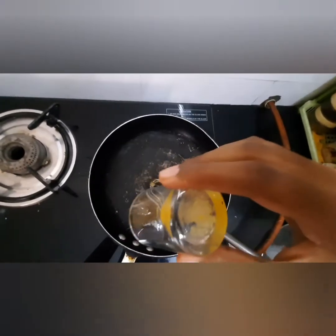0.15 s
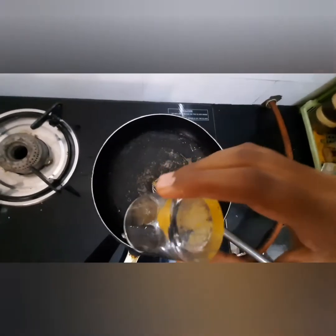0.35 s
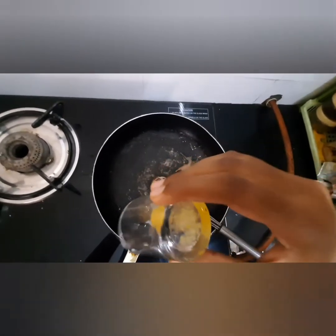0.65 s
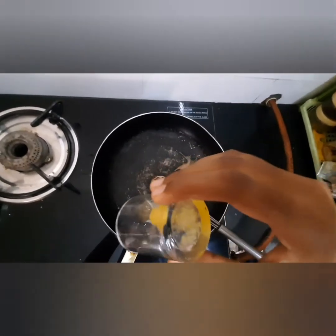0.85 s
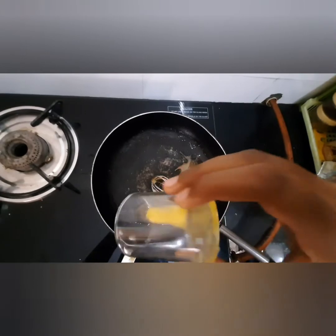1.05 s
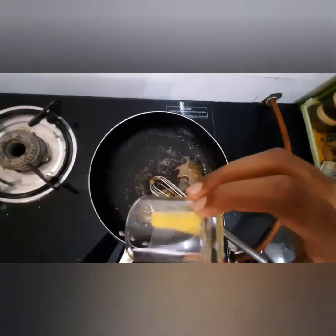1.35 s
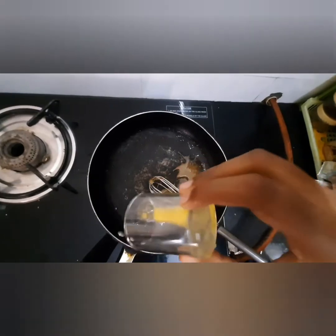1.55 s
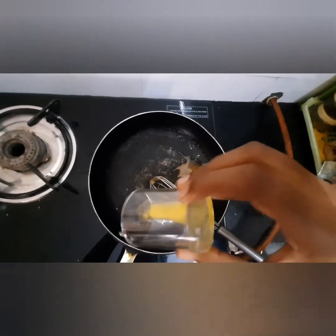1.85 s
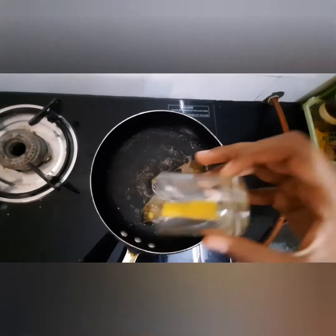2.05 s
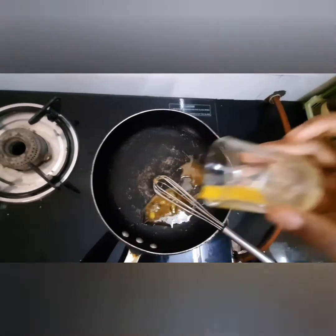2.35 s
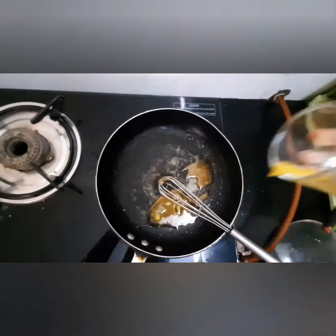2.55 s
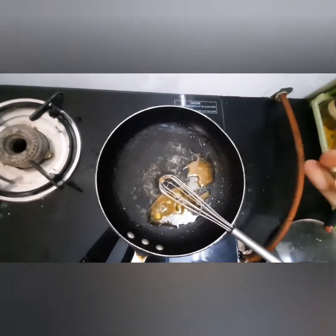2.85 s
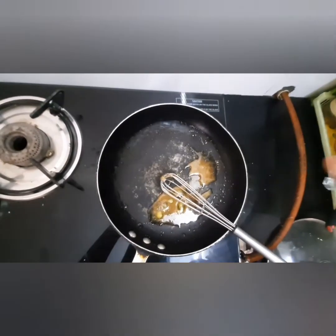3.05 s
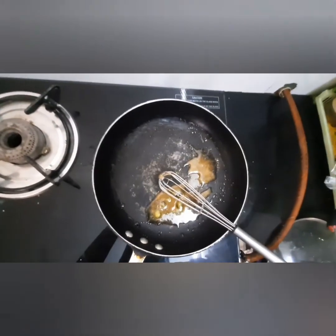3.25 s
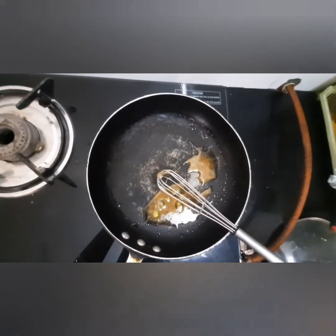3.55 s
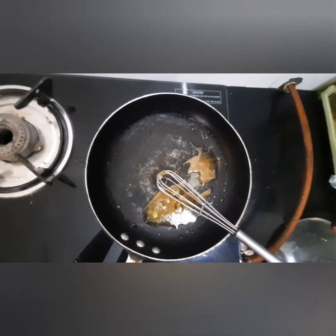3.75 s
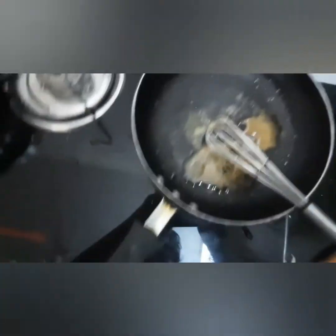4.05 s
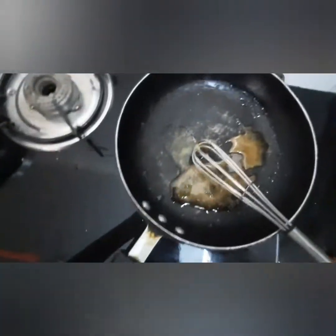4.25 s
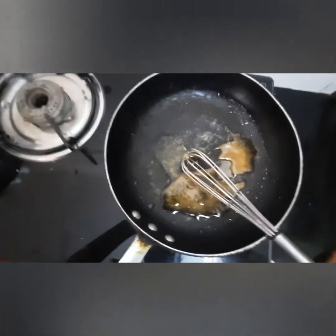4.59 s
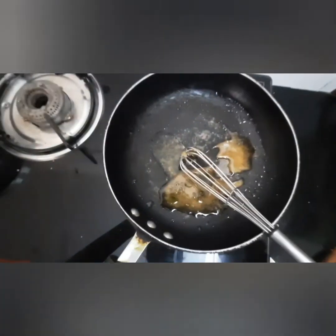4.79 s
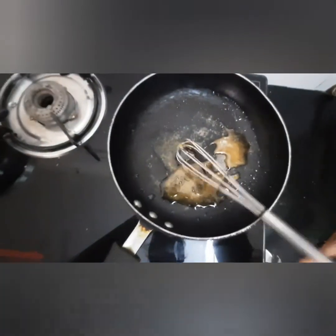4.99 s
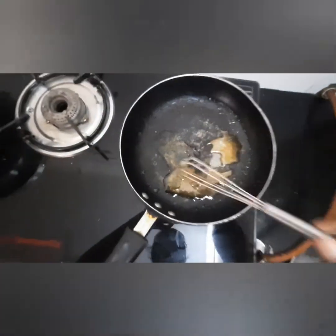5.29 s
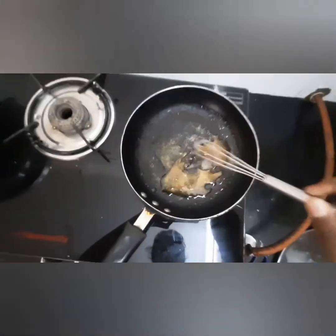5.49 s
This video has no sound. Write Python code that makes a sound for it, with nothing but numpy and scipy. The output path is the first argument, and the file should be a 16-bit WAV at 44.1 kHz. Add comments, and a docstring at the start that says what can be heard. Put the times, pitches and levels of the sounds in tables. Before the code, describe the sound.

Nearly quiet at first: low burner flutter, a faint grainy simmer, tiny sticky clicks from a glass. Then butter fries in a pan, thin and distant, with a quick cluster of hard knocks. The microphone seems to move nearer and the frying turns loud, dense and spitting. Metal wires finally clink and rasp on the pan. Short, dry kitchen reflections, stereo pickup.

```python
"""Frying fat fizzes, spits and crackles as melted butter floods hot sugar in a pan: clumped clicks,
ringing bubbles, noise, and single pops and pings. A wire whisk taps and scrapes the pan's modes at the end.
Before that, a glass ticks, creeps and knocks: short decaying modes and noise snaps.
Below lie a gas burner's drone and flutter, a faint simmer of the sugar and the still of the kitchen."""
import sys
import numpy as np
from scipy import signal
from scipy.fft import rfft, irfft
from scipy.io import wavfile
from scipy.ndimage import uniform_filter1d

SR = 44100
rng = np.random.default_rng(int(sys.argv[2]) if len(sys.argv) > 2 else 0)


def persist_wave(psi):
    """Save psi, clipped to +-1, as 16-bit WAV."""
    counts = np.round(np.clip(psi, -1, 1) * 32767).astype(np.int16)
    wavfile.write(sys.argv[1], SR, np.atleast_2d(counts).T)


N = 248194


def from_db(db):
    """Decibels to gain."""
    return 10 ** (np.asarray(db) / 20)


def rms_one(x):
    """Scale to unit rms."""
    return x / np.sqrt(np.mean(x ** 2) + 1e-20)


def peak_one(x):
    """Scale to unit peak."""
    return x / (np.abs(x).max() + 1e-20)


def energy_one(x):
    """Scale each channel to unit energy."""
    return x / np.linalg.norm(x, axis=-1, keepdims=True)


def level_one(x):
    """Keep the grain but even out the slow level."""
    power = uniform_filter1d(np.mean(x ** 2, axis=0), size=3000)
    return x / np.sqrt(power + 1e-9)


def in_time(rows):
    """Each column of a curve at every sample."""
    times_s, *columns = np.transpose(rows)
    return [np.interp(np.arange(N) / SR, times_s, column) for column in columns]


def during(rows):
    """One while a curve lasts, with short fades."""
    start_s, end_s = rows[0][0], rows[-1][0]
    return np.interp(np.arange(N) / SR, [start_s - .02, start_s, end_s, end_s + .05], [0, 1, 1, 0])


def drift(rate):
    """Slow random curve of unit rms, with `rate` knots per second."""
    knots = rng.standard_normal(4000)
    return rms_one(np.interp(np.arange(N) / SR * rate, np.arange(len(knots)), knots))


def dying(t60, size=8192):
    """Exponential decay by 60 dB in t60 seconds."""
    return from_db(-60 * np.arange(size) / SR / max(t60, 1e-4))


def add(track, time_s, sound):
    """Mix a short sound into a track."""
    at = int(np.clip(round(time_s * SR), 0, N - 1))
    track[..., at:at + sound.shape[-1]] += sound[..., :N - at]


def coloured(x, spectrum, size=4096):
    """Causal (minimum-phase) filter with the given spectrum."""
    hz, db = np.transpose(spectrum)
    grid_hz = np.maximum(np.arange(size // 2 + 1) * SR / size, 1)
    gain = from_db(np.interp(np.log(grid_hz), np.log(hz), db))
    # fold the cepstrum onto positive time
    cepstrum = irfft(np.log(gain))
    cepstrum[1:size // 2] *= 2
    cepstrum[size // 2 + 1:] = 0
    response = irfft(np.exp(rfft(cepstrum)))
    return signal.oaconvolve(np.atleast_2d(x), response[None], axes=-1)[:, :x.shape[-1]]


def band(x, low_hz, high_hz, order=2):
    """Band-pass."""
    edges_hz = [low_hz, min(high_hz, SR / 2 - 1)]
    return signal.sosfilt(signal.butter(order, edges_hz, "band", fs=SR, output="sos"), x + 1e-18)


def ring(clicks, hz, t60):
    """A resonance that a unit click sets ringing with height 1."""
    radius = from_db(-60 / (t60 * SR))
    angle = 2 * np.pi * hz / SR
    return signal.lfilter([.5, 0, -.5], [1, -2 * radius * np.cos(angle), radius * radius], clicks + 1e-18)


def air(side_db):
    """Stereo noise, partly shared by both sides."""
    mid, side = rng.standard_normal((2, N))
    return mid + from_db(side_db) * side * np.array([[1], [-1]])


def grains(per_s, spread_db):
    """Random stereo clicks, many small and few large, each with its own balance and lag; unit rms."""
    rate = np.broadcast_to(per_s, N)[:-4]
    at = np.flatnonzero(rng.random(N - 4) < rate / SR)
    heights = from_db(spread_db * np.minimum(rng.exponential(1, len(at)), 3.5))
    # large where sparse, so that the power does not follow the rate
    sizes = heights * rng.choice([-1, 1], len(at)) / np.sqrt(rate[at])
    out = np.zeros((2, N))
    for ear in out:
        ear[at + rng.integers(0, 4, len(at))] = sizes * from_db(rng.normal(0, 3, len(at)))
    return rms_one(out)


KITCHEN_T60_S = 0.16


def kitchen(x, wall_db, room_db):
    """Direct sound, quick scatter off pan wall and hob, then the room; separate echoes per channel."""
    scatter, tail = rng.standard_normal((2, 2, 8192))
    scatter = band(scatter, 2300, 25500, order=1) * dying(t60=0.046) * (1 - dying(t60=0.00068))
    tail = band(tail, 140, 9140, order=1) * dying(KITCHEN_T60_S) * (1 - dying(t60=0.045))
    response = from_db(wall_db) * energy_one(scatter) + from_db(room_db) * energy_one(tail)
    response[:, 0] += 1
    return signal.oaconvolve(np.atleast_2d(x), response, axes=-1)[:, :N]


# still of the kitchen: (frequency [Hz], density [dB per Hz])
FLOOR_COLOUR = [(25, -12.5), (70, 4), (160, -4), (340, -6), (600, -23), (950, -22.5), (1350, -31),
                (1900, -22.5), (2500, -28.5), (6400, -33), (9500, -34), (16000, -38.5)]
FLOOR_DB = -61


def still():
    """Steady coloured stereo noise."""
    return from_db(FLOOR_DB) * rms_one(coloured(air(side_db=0.0), FLOOR_COLOUR))


# flame flutter: (time [s], level [dB])
FLAME_CURVE = [(0, -59), (.13, -55), (.36, -55), (.43, -61), (.58, -72), (.625, -50), (.86, -60),
               (.96, -54), (1.36, -50), (1.7, -55), (1.89, -47), (2.07, -56.5), (2.33, -43.5), (2.6, -49),
               (2.82, -63), (2.92, -55), (3.96, -62), (4.28, -51.5), (4.62, -68.5), (5.2, -66)]
# grainy rustle: (time [s], level relative to flutter [dB])
RUSTLE_CURVE = [(0, -10), (.2, -17.5), (.65, -17), (1.45, -17.5), (1.7, -14), (2.05, -9), (2.33, -17.5),
                (2.8, -11.5)]
# drone swells: (time of top [s], rms level [dB])
DRONE_SWELLS = [(.18, -47.5), (.31, -45), (.64, -52), (.82, -50), (1.03, -50.5), (1.17, -54), (1.34, -50),
                (1.52, -51.5), (1.67, -46), (1.91, -48.5), (2.2, -53), (2.33, -46), (2.52, -45.5),
                (2.7, -47), (2.84, -48), (3.21, -48), (3.31, -45.5), (3.5, -51), (4.28, -51.5)]
# flutter and rustle colours: (frequency [Hz], density [dB per Hz])
FLUTTER_SPECTRUM = [(60, -18), (140, -2.5), (230, 3.5), (340, 6.5), (430, 0.5), (520, -14), (800, -37),
                    (1500, -64)]
RUSTLE_SPECTRUM = [(300, -6), (650, 2.5), (1000, 5.5), (1400, -9), (1900, 3.5), (2300, -10), (2900, -6.5),
                   (3600, -15.5), (6000, -15.5), (9000, -17.5), (15000, -49)]
SWELL_WIDTH_S, DRONE_HZ, DRONE_REST_DB = 0.064, 112, -68.5


def burner():
    """Narrow-band drone in swells, lumpy flutter above it, and a grainy rustle that follows the flutter."""
    t = np.arange(N) / SR
    flutter_db, = in_time(FLAME_CURVE)
    rustle_db, = in_time(RUSTLE_CURVE)
    swell_power = sum(from_db(2 * db) * np.exp(-((t - top_s) / SWELL_WIDTH_S) ** 2)
                      for top_s, db in DRONE_SWELLS)
    drone_gain = np.hypot(np.sqrt(swell_power), from_db(DRONE_REST_DB))
    drone = level_one(band(air(side_db=-17.5), 0.921 * DRONE_HZ, 1.06 * DRONE_HZ))
    lumps = from_db(3.5 * np.tanh(drift(rate=40)) - .5)
    flutter = level_one(coloured(air(side_db=-9.0), FLUTTER_SPECTRUM)) * lumps
    grit = air(side_db=0.5) + 0.81 * grains(per_s=300, spread_db=6.0)
    rustle = rms_one(coloured(grit, RUSTLE_SPECTRUM)) * from_db([[3.5], [-1.5]])
    flame = flutter + from_db(rustle_db) * rustle
    return drone_gain * drone + from_db(flutter_db) * flame


# first faint fizz of the hot sugar: (time [s], level [dB])
SIMMER_CURVE = [(.15, -80.5), (.21, -73), (.34, -70), (.55, -83)]


def simmer():
    """Thin, grainy hiss before the fat arrives: band-passed noise and clicks."""
    hiss = band(air(side_db=-12.5) + 1.3 * grains(per_s=720, spread_db=4.0), 2650, 9400, order=1)
    return during(SIMMER_CURVE) * from_db(in_time(SIMMER_CURVE)[0]) * rms_one(hiss)


TIP_DB, TIP_T60_S, TIP_HZ = -66, 0.84, (1780, 2330)  # level before the decay


def tipping():
    """Soft rustle as the glass tips: band-passed clicks, decaying from the start."""
    rustle = band(grains(per_s=900, spread_db=4.5), *TIP_HZ)
    return from_db(TIP_DB) * dying(TIP_T60_S, size=N) * rms_one(rustle)


# last of the butter creeping out of the glass
CREEP_START_S, CREEP_END_S, CREEP_ATTACK_S, CREEP_RELEASE_S = 1.56, 2.88, 0.068, 0.46
CREEP_DB, CREEP_HZ, CREEP_T60_S = -73, 3046, 0.011  # level before drift and balance


def creep():
    """Tiny sticky slips keep one thin glass resonance sounding, mostly on the left."""
    t = np.arange(N) / SR
    attack = np.clip((t - CREEP_START_S) / CREEP_ATTACK_S, 0, 1)
    release = np.clip((CREEP_END_S - t) / CREEP_RELEASE_S, 0, 1)
    rasp = rms_one(ring(grains(per_s=830, spread_db=2.5), CREEP_HZ, CREEP_T60_S))
    level = from_db(CREEP_DB + 2 * drift(rate=13))
    return level * attack * release * rasp * from_db([[3], [-4]])


# sticky ticks as the butter slides: (time [s], dry peak [dB], pitch [Hz])
GLASS_TICKS = [(1.0189, -38.5, 5800), (1.025, -45.5, 6030), (1.035, -43, 5900), (1.191, -57, 6200),
               (1.2473, -47, 7500), (1.264, -47, 7400), (1.278, -47, 6900), (1.3168, -37.5, 6100),
               (1.341, -42.5, 5940), (1.357, -44, 5570), (1.377, -48, 5200), (1.391, -36, 4600),
               (2.476, -38.5, 3350)]
# glass damped by the fingers: (frequency [Hz], level [dB], t60 [s])
GLASS_MODES = [(1003, 7, 0.04), (1880, 4, 0.038), (2800, 8, 0.027), (5760, -3, 0.014)]
# dull knocks: (time [s], peak before balance [dB], hollow pitch [Hz], contact noise / hollow ring [ratio])
GLASS_KNOCKS = [(2.134, -41, 350, .1), (2.155, -42, 400, 0.85), (2.1931, -33.5, 560, 2.2),
                (2.357, -38, 365, 0.09), (3.677, -30.5, 677, 2.4), (3.6812, -26.5, 640, 2.2),
                (3.686, -27.5, 394, 0.9), (3.6945, -30, 637, 2)]
# contact noise: (frequency [Hz], density [dB per Hz])
KNOCK_SPECTRUM = [(60, -10), (250, 2), (450, 4), (650, 11), (900, -3), (1300, -1.5), (2200, -3),
                  (3500, -18), (9000, -38)]
TICK_RISE_S, GRIP_DETUNE_SHARE, GLASS_SHARE = .007, .02, .4
TICK_TOP_RATIO = 1.45  # a slow peel holds little above its own pitch
HOLLOW_T60_S = .018


def glass():
    """Sticky peels: noise snaps that barely ring the glass; knocks: contact noise plus a damped sine."""
    ticks, knocks, t = np.zeros((2, N)), np.zeros(N), np.arange(8192) / SR
    for time_s, peak_db, hz in GLASS_TICKS:
        modes = 0
        for mode_hz, mode_db, t60 in GLASS_MODES:
            # the shifting grip detunes each mode
            held_hz = mode_hz * rng.normal(1, GRIP_DETUNE_SHARE)
            phase = rng.uniform(0, np.pi, (2, 1))
            modes = modes + from_db(mode_db) * dying(t60) * np.sin(2 * np.pi * held_hz * t + phase)
        snap = band(rng.standard_normal((2, len(t))) * dying(t60=0.028), 0.68 * hz, 1.15 * hz, order=1)
        peel = (1 - dying(TICK_RISE_S)) * (GLASS_SHARE * peak_one(modes) + peak_one(snap))
        tick = band(peel, 870, TICK_TOP_RATIO * hz, order=3)
        add(ticks, time_s, from_db(peak_db) * peak_one(tick))
    for time_s, peak_db, hz, contact_ratio in GLASS_KNOCKS:
        contact = coloured(rng.standard_normal(8192) * dying(t60=.03), KNOCK_SPECTRUM)[0]
        hollow = dying(HOLLOW_T60_S) * np.sin(2 * np.pi * hz * t)
        add(knocks, time_s, from_db(peak_db) * peak_one(contact_ratio * peak_one(contact) + hollow))
    knocks = kitchen(knocks * from_db([[2.5], [-2.5]]), wall_db=-11, room_db=-13)
    return kitchen(ticks, wall_db=-20, room_db=-8.5) + knocks


# steam singing hoarsely through the sugar: (time [s], level [dB])
SINGING_CURVE = [(3.14, -60), (3.175, -48.5), (3.24, -55), (3.33, -59.5), (3.4, -62)]


def singing():
    """Steam forced through the melt flutters in one narrow resonance."""
    flutter = band(grains(per_s=540, spread_db=0.0), 1680, 1828)
    return during(SINGING_CURVE) * from_db(in_time(SINGING_CURVE)[0]) * level_one(flutter)


# wires striking the pan: (time [s], nominal peak [dB], centre of the struck modes [Hz])
WHISK_TAPS = [(5.1396, -12.5, 2460), (5.223, -30.5, 1200), (5.268, -21, 1090), (5.288, -19, 1050),
              (5.377, -23.5, 1000), (5.434, -18.5, 1700), (5.444, -24, 1386), (5.455, -25.5, 1080),
              (5.465, -25, 1100), (5.474, -24.5, 1070), (5.509, -26, 1096), (5.521, -24.5, 1140),
              (5.619, -15.5, 1626)]
# whisk dragging: (time [s], ringing level [dB], pan body level [dB])
WHISK_SCRAPE = [(5.11, -43.5, -59), (5.19, -49.5, -64), (5.29, -35, -46.5), (5.335, -37.5, -43),
                (5.36, -44, -46), (5.41, -38, -48.5), (5.47, -32, -54), (5.5, -39.5, -56),
                (5.585, -41.5, -58.5), (5.625, -32, -47.5)]
# pan with the whisk on it: (frequency [Hz], level [dB], t60 [s])
PAN_MODES = [(336.7, -13, 0.13), (390.7, -20, 0.089), (423, -14, 0.096), (1044, 9, 0.074),
             (1120.6, 7.5, 0.06), (1874.6, -2.5, 0.085), (1946.7, -1.5, 0.072), (2855, 3, 0.039),
             (3650, -16, 0.022), (6400, -9, 0.04)]
RASP_HZ, RASP_SHARE = (950, 1200), .6  # sliding wires roughen the ring around the strongest modes
RUBS_PER_S, RUB_DB = 90, 4  # wires catch and let go
DRAG_HIGH_DB = -8  # dragging is too soft a contact to ring the high modes fully
GRIT_DB = -8  # sugar crunching under the wires, relative to the ringing


def whisk_drag():
    """Small slips of the wires over the sugar ring the pan modes, neighbours in opposite phase."""
    scrape_db, body_db = in_time(WHISK_SCRAPE)
    slips = level_one(grains(per_s=800, spread_db=2.5).mean(axis=0)[None])
    rings = [(-1) ** k * from_db(mode_db) * ring(slips, hz, t60)
             for k, (hz, mode_db, t60) in enumerate(PAN_MODES)]
    # leaning on the whisk shakes the three lowest modes, those of the whole pan
    body = level_one(sum(rings[:3]))
    ringing = level_one(sum(rings[3:5]) + from_db(DRAG_HIGH_DB) * sum(rings[5:]))
    rasp = level_one(band(slips, *RASP_HZ))
    scrape = level_one(ringing + RASP_SHARE * rasp)
    grit = level_one(band(grains(per_s=260, spread_db=5.5), 1500, 4400, order=1))
    drag = from_db(body_db) * body + from_db(scrape_db) * scrape + from_db(scrape_db + GRIT_DB) * grit
    rub = from_db(RUB_DB * np.tanh(drift(RUBS_PER_S)))
    return during(WHISK_SCRAPE) * rub * drag


def whisk_taps():
    """Each wire blow rings the pan modes nearest its centre pitch, with a burst of chatter noise."""
    taps, t = np.zeros((2, N)), np.arange(8192) / SR
    for time_s, peak_db, centre_hz in WHISK_TAPS:
        blow = 0
        for k, (hz, mode_db, t60) in enumerate(PAN_MODES):
            # modes far from the centre pitch, above or below, ring less
            struck_db = mode_db - 23.0 * abs(np.log2(hz / centre_hz))
            # the wire loads each mode a little differently each time
            loaded_hz = hz * rng.normal(1, 0.0071)
            tone = dying(t60) * np.sin(2 * np.pi * loaded_hz * t)
            blow = blow + (-1) ** k * from_db(struck_db) * tone
        chatter = rng.standard_normal((2, len(t))) * dying(t60=0.052)
        chatter = band(chatter, 0.85 * centre_hz, 1.36 * centre_hz)
        add(taps, time_s, from_db(peak_db) * (0.715 * peak_one(blow) + 0.45 * peak_one(chatter)))
    return taps


def whisk():
    """Taps and drag ring the same pan, slightly to the left, within the kitchen."""
    contact = band(whisk_taps() + whisk_drag(), 240, 15000)
    return kitchen(contact, wall_db=-3.5, room_db=-15.5) * from_db([[1.2], [-1.2]])


# clearest bubbles ringing as they open: (time [s], dry peak [dB], pitch [Hz], t60 [s])
BUBBLE_PINGS = [(4.322, -21, 3840, 0.022), (4.403, -20.5, 7200, 0.0059), (4.546, -11, 7700, 0.00345),
                (4.559, -15, 7900, 0.0048), (4.6291, -22, 3126, 0.015), (4.6547, -14.5, 7000, 0.0053),
                (4.662, -19, 6470, .005), (4.668, -21, 4300, 0.011), (4.889, -19.5, 7820, .0045),
                (4.68, -14, 7900, 0.0055), (4.7382, -18, 6990, .004), (4.751, -14, 6460, 0.00314),
                (4.7574, -16.5, 6800, 0.006), (4.7789, -15, 4160, 0.011), (4.8525, -18.5, 4040, 0.016),
                (4.875, -20, 4180, 0.018), (4.941, -14, 6080, 0.00366), (4.9531, -19, 3840, 0.022),
                (4.979, -18.5, 3860, 0.016), (5.042, -23.5, 6400, 0.0049), (5.207, -15.5, 5400, 0.007),
                (5.265, -13.5, 6250, 0.008), (5.316, -24, 6500, .004), (5.5245, -21, 7960, 0.0045),
                (5.536, -19.5, 7100, 0.0042), (5.5732, -24, 4880, .007), (5.611, -19.5, 7650, 0.0063)]
PING_RISE_SHARE, PING_OPEN_S, PING_WOBBLE_SHARE = 0.036, 0.00083, .03
SPIT_SHARE, SPIT_T60_S = .55, .014  # broad crackle of the tearing skin


def pings():
    """An opening bubble spits and rings unsteadily, rising in pitch; phase differs per channel."""
    out = np.zeros((2, N))
    for time_s, peak_db, hz, t60 in BUBBLE_PINGS:
        fade = dying(t60, size=2048)
        opening = 1 - dying(PING_OPEN_S, size=2048)
        wobble = rms_one(uniform_filter1d(rng.standard_normal(2048), size=24))
        pitch_hz = hz * (1 + PING_RISE_SHARE * (.5 - fade) + PING_WOBBLE_SHARE * wobble)
        phase = 2 * np.pi * np.cumsum(pitch_hz) / SR + rng.uniform(0, 2, (2, 1))
        tone = opening * fade * np.sin(phase)
        spit = rng.standard_normal((2, 2048)) * rng.exponential(1, 2048) * dying(SPIT_T60_S, size=2048)
        spit = band(spit, hz / 3, hz * 1.6, order=1)
        add(out, time_s, from_db(peak_db) * peak_one(peak_one(tone) + SPIT_SHARE * peak_one(spit)))
    return kitchen(out, wall_db=-2.0, room_db=-11.0)


# steam pockets bursting: (time [s], nominal rms over 3 ms [dB], strongest pitch [Hz],
# spray relative to burst [dB], leak relative to burst [dB])
STEAM_POPS = [(3.2493, -32, 12000, -11, -6.5), (3.403, -32.5, 1618, -19, -13),
              (3.4465, -27.5, 1520, -17, -8), (3.505, -36, 1700, -16, -20),
              (3.5815, -32.5, 3000, -13, -16.5), (4.0043, -43, 4490, -14, -19),
              (3.8756, -39, 15140, -5.5, -0.5), (4.2462, -30.5, 1880, -15, -12),
              (4.2616, -33, 4470, -4.5, -16), (4.2738, -32.5, 9000, 2, -17), (4.3554, -31, 1290, -0.5, -11),
              (4.3793, -31.5, 4500, -7.5, -15.5), (4.4607, -21.5, 6030, -12, -16),
              (4.4727, -27.5, 12000, -11, -1), (4.5309, -25.5, 2920, -19, -4),
              (4.5362, -27, 5493, -17, -7.5), (4.616, -30, 2900, -8, -13), (4.6956, -22, 14990, -17, -18.5),
              (4.751, -24.5, 2330, -7, -9), (4.786, -32.5, 13000, 0, 2.5), (4.8067, -31.5, 7640, 1, -13.5),
              (4.82, -32, 7500, -13.5, -4), (4.91, -30.5, 3000, 4, -16), (4.918, -18, 2540, -8, -14),
              (4.9632, -27, 12130, -9, -11.5), (4.9722, -21, 12000, -14, -2.5),
              (4.998, -23.5, 6043, -17, -17), (5.0296, -19.5, 6800, -8, -14),
              (5.0637, -24, 5940, -4.5, -3.5), (5.2247, -30, 2970, -5, -16), (5.267, -30.5, 14000, -14, -9),
              (5.279, -30, 2500, -15, -21), (5.3305, -23.5, 9400, -21, -12), (5.461, -36, 3370, 4, -13.5)]
POP_SLOPE_DB, POP_TOP_SLOPE_DB = 4, 5  # loss per octave for bands below and above the strongest pitch
LEAK_S, LEAK_T60_S = 0.013, 0.024  # steam hiss swelling just before the skin gives way


def pops():
    """A pocket leaks, bursts with one pressure swing, rattles in the pan, then throws a droplet spray."""
    out, click = np.zeros((2, N)), signal.unit_impulse(2048)
    first_samples = .003 * SR
    edges_hz = np.array([(800, 2800), (2600, 9060), (10200, 16300)])
    centres_hz = np.sqrt(edges_hz.prod(axis=1))
    thump, crack, snap = (energy_one(band(click, low, high)) for low, high in edges_hz)
    lead = int(LEAK_S * SR)
    for time_s, burst_db, hz, spray_db, leak_db in STEAM_POPS:
        # large pockets thump, small ones snap
        octaves = np.log2(centres_hz / hz)
        slope_db = np.where(octaves > 0, POP_TOP_SLOPE_DB, POP_SLOPE_DB)
        thump_db, crack_db, snap_db = burst_db - slope_db * abs(octaves)
        pulse = from_db(thump_db) * thump - from_db(crack_db) * crack + from_db(snap_db) * snap
        rattle, spray, leak = rng.standard_normal((3, 2, 8192)) * np.sqrt(rng.exponential(1, 8192))
        burst = energy_one(signal.unit_impulse(8192) + energy_one(rattle * dying(t60=.007)))
        spray = energy_one(spray * dying(t60=0.12) * (1 - dying(t60=0.0041)))
        # a reversed decay swells
        swell = energy_one((leak * dying(LEAK_T60_S))[:, :lead])[:, ::-1]
        course = np.hstack([from_db(leak_db) * swell, burst + from_db(spray_db) * spray])
        pop = np.sqrt(first_samples) * signal.fftconvolve(course, pulse[None], axes=-1)
        add(out, time_s - lead / SR, pop)
    return kitchen(out, wall_db=-5.5, room_db=-11.0)


# fat flaring up on a fresh hot spot: (time [s], length [s], crackle gain [dB], fizz gain [dB])
HOT_SPOT_FLARES = [(2.9, 0.034, 2, 0), (3.248, 0.052, 3, 7.5), (4.241, 0.0216, 3, 7.5),
                   (4.356, 0.055, 7, 2.5), (4.465, 0.036, 4.5, -7), (4.517, 0.05, 6, 2),
                   (4.599, 0.039, 8.5, 1), (4.838, 0.04, 7, 2.5), (5.459, 0.028, 5, -7),
                   (5.597, 0.028, 5, 6)]
FLARE_ATTACK_S, FLARE_RELEASE_S = 0.0069, 0.021


def flares():
    """Gain in dB of crackle and fizz: each flare rises quickly, holds and dies away."""
    t, gains_db = np.arange(N) / SR, np.zeros((2, N))
    for time_s, length_s, crackle_db, fizz_db in HOT_SPOT_FLARES:
        attack = np.clip((t - time_s) / FLARE_ATTACK_S, 0, 1)
        release = np.clip(1 - (t - time_s - length_s) / FLARE_RELEASE_S, 0, 1)
        gains_db += np.outer([crackle_db, fizz_db], attack * release)
    return gains_db


def froth(per_s, cycles, count=14):
    """Bubbles of many sizes, each decaying 60 dB in a set number of cycles; equal power per Hz."""
    pitches_hz = np.geomspace(1500, 15000, count)
    total = 0
    for hz in pitches_hz:
        strikes = grains(per_s * hz / pitches_hz.sum(), spread_db=3.5)
        total = total + np.sqrt(hz) * rms_one(ring(strikes, hz, cycles / hz))
    return rms_one(total)


# vigour as the fat floods the sugar, before flares: (time [s], crackle level [dB], fine fizz level [dB])
FRYING_CURVE = [(2.862, -63, -74), (2.895, -46, -47), (3.14, -48, -58.5), (3.31, -44, -44),
                (3.5, -42, -49.5), (3.63, -47.5, -51), (3.72, -45, -43), (3.82, -49, -49.5),
                (3.86, -45, -45.5), (3.99, -48, -54), (4.06, -45.5, -63), (4.215, -50.5, -55),
                (4.26, -38.5, -41), (4.5, -39, -40), (4.64, -40, -33.5), (4.82, -40.5, -41),
                (4.93, -35.5, -37), (5.11, -37, -43), (5.28, -38.5, -42), (5.62, -43, -43)]
# closeness of the fat: (time [s], crackle rate [1/s], share of near colour [0-1])
CLOSENESS_CURVE = [(2.8, 2200, 0.06), (4.2, 1596, 0), (4.32, 1000, 1), (5.6, 800, 1)]
# frying colours: (frequency [Hz], density [dB per Hz])
FAR_SPECTRUM = [(200, -48), (480, -7), (650, -0.5), (820, -2), (1000, 7.5), (1400, -3), (1750, 6),
                (2150, 1), (2650, 3.5), (3700, 0.5), (7000, -5.5), (9500, -11), (12500, -8)]
NEAR_SPECTRUM = [(200, -56), (500, -1), (850, -5), (1050, 3), (1500, -4.5), (1880, 4.5), (2300, -3.5),
                 (3100, 4.5), (4000, 2), (5000, 0), (7000, -2.5), (9500, -2), (12500, -17.5)]
FIZZ_SPECTRUM = [(4000, -76), (8000, 5.5), (10500, 5.5), (12500, 7), (14000, 4), (16000, 3.5)]
SURGE_DB, SURGES_PER_S = 2.0, 70  # random surges and lulls of the boil


def frying():
    """Clumped clicks and ringing bubbles over smooth hiss, recoloured when close, plus fine droplet fizz."""
    crackle_db, fizz_db = in_time(FRYING_CURVE) + flares()
    per_s, near = in_time(CLOSENESS_CURVE)
    near = np.clip(near, 0, 1)
    clump_db = (1.0 + 1.0 * near) * drift(rate=130) + SURGE_DB * drift(SURGES_PER_S)
    clumps = level_one(from_db(clump_db)[None])
    clicks = level_one(grains(per_s, spread_db=5.5))
    bubbles = from_db(-7.5 + 10.3 * near) * level_one(froth(per_s, cycles=15.9))
    hiss = from_db(-7.0) * air(side_db=-19.0)
    sizzle = level_one(kitchen(clicks + bubbles, wall_db=-4.5, room_db=-5.0) + hiss) * clumps
    far_crackle = np.sqrt(1 - near) * rms_one(coloured(sizzle, FAR_SPECTRUM))
    near_crackle = np.sqrt(near) * rms_one(coloured(sizzle, NEAR_SPECTRUM))
    crackle = far_crackle + near_crackle
    # the tiniest droplets boil off on their own
    droplets = level_one(grains(per_s, spread_db=6.0)) + from_db(1.0) * air(side_db=-2.0)
    fizz = rms_one(coloured(droplets * clumps, FIZZ_SPECTRUM))
    return during(FRYING_CURVE) * (crackle * from_db(crackle_db) + fizz * from_db(fizz_db))


def scene():
    """Everything on the hob, over the still of the room."""
    background = still() + burner() + simmer()
    pouring = tipping() + creep() + glass()
    return background + pouring + singing() + whisk() + pings() + pops() + frying()


# two microphone ports: (frequency [Hz], gain [dB])
LEFT_PORT_RESPONSE = [(100, -3), (600, -1), (1000, 2), (1800, 1), (3100, 1.5), (4500, -2.5), (6200, 0.5),
                      (8000, -17), (10000, -7), (12500, 3), (16000, -3.5)]
RIGHT_PORT_RESPONSE = [(100, -5), (600, -2.5), (1000, 2), (1800, -1.5), (3100, -3.5), (4500, -0.5),
                       (6200, 3.5), (8000, 3), (10000, -2), (12500, 1), (16000, 4.5)]
CUTOFF_HZ = 15800


def record(dry):
    """Each port colours its channel; the sharpest peaks are rounded and the top is cut."""
    heard = np.vstack([coloured(dry[0], LEFT_PORT_RESPONSE), coloured(dry[1], RIGHT_PORT_RESPONSE)])
    heard = .75 * np.tanh(heard / .75)
    return signal.sosfilt(signal.ellip(10, .2, 70, CUTOFF_HZ, fs=SR, output="sos"), heard)


dry = scene()
out = record(dry)
persist_wave(out)
```